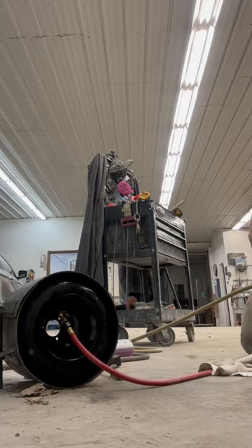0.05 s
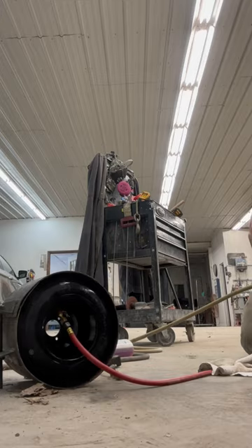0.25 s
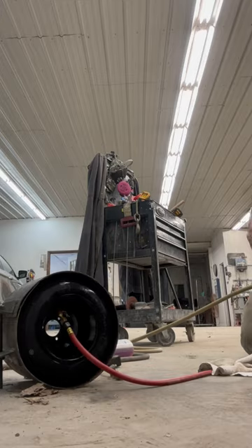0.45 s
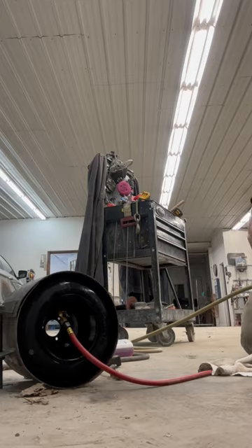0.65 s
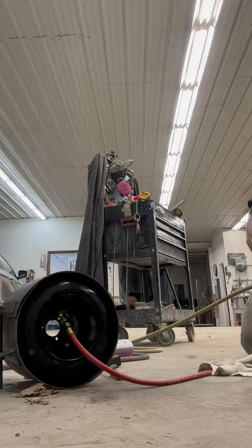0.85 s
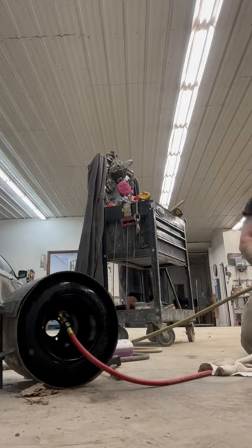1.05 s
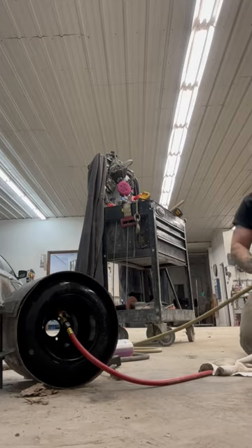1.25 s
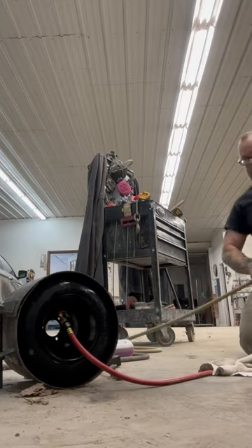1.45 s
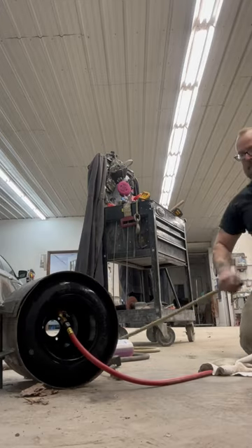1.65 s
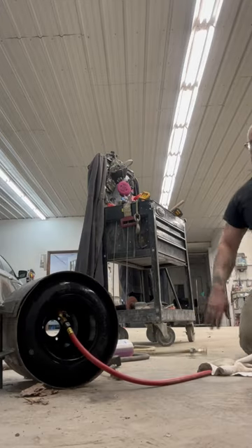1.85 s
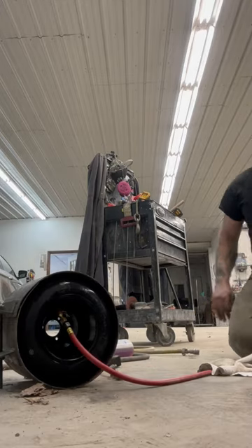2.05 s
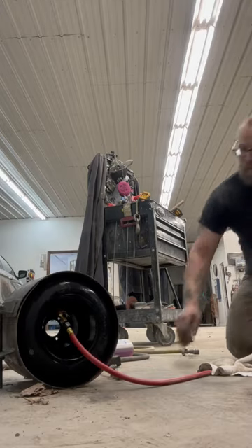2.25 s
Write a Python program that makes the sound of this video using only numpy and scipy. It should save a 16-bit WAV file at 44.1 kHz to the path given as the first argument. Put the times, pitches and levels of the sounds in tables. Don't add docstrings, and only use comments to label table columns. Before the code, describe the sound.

Tyre bead pops hard onto a steel rim amid hissing air, booming through a large workshop

```python
import sys
import numpy as np
from scipy import signal
from scipy.fft import rfft, irfft, next_fast_len
from scipy.io import wavfile
from scipy.ndimage import uniform_filter1d

SR = 44100
rng = np.random.default_rng(int(sys.argv[2]) if len(sys.argv) > 2 else 0)


def rack_gain(trim_db):
    fader = np.asarray(trim_db, float)
    return 10 ** (fader / 20)


def to_wav(sig):
    pcm = np.clip(np.atleast_2d(sig), -1, 1) * 32767
    pcm = np.round(pcm).astype(np.int16)
    wavfile.write(sys.argv[1], SR, pcm.T)


N = 101429
PADDED_N = next_fast_len(N + 16384)
F_HZ = np.maximum(np.fft.rfftfreq(PADDED_N, 1 / SR), 1.)
T_S = np.arange(N) / SR

# frequency in Hz, level in dB.
HUM_COLOUR = [(30, -33), (60, 0.5), (100, 3), (170, -1.5), (300, -19), (1000, -13), (3000, -29),
              (9000, -52)]
# frequency in Hz, rms level in dB.
DRONES = [(94, -73), (175, -74.5)]
# frequency in Hz, rms level in dB.
WHISTLES = [(1981, -65), (2745, -64), (4657, -60), (5453, -63.5), (6013, -57.5), (11402, -71.5),
            (12301, -73.5), (12430, -80.5), (12947, -75), (13550, -74)]
# time in seconds, level in dB.
AIR_FLOW = [(0, -47), (.19, -43.5), (.235, -40), (.3, -44), (.52, -66.5), (.6, -61.5), (1.1, -69.5),
            (1.36, -62), (1.43, -53), (1.49, -49), (1.52, -46), (1.6, -52.5), (1.75, -54.5), (1.8, -67.5),
            (1.87, -74.5), (2.02, -77), (2.04, -105), (2.3, -100)]
# frequency in Hz, density in dB per Hz.
HISS_COLOUR = [(300, -18), (1000, -14), (2000, -5.5), (3600, -6), (6000, -4.5), (9000, -1.5), (13000, -0.5),
               (15700, -1.5)]
# frequency in Hz, T60 in seconds.
HALL_T60 = [(40, 0.43), (150, 0.68), (500, 0.98), (2000, 1.24), (4000, 0.98), (8000, 0.61), (16000, 0.71)]
# frequency in Hz, side level over mid in dB.
SIDE_OVER_MID = [(60, -44.5), (200, -21), (600, -11.5), (1300, -2.5), (2200, -10.5), (5500, 1.5),
                 (6900, -35), (16000, -51.5)]
# frequency in Hz, level in dB.
BEAD_COLOUR = [(50, 0), (150, -11), (450, 0), (900, 0), (1400, -7.5), (2400, -6.5), (5000, -19),
               (16000, -33)]
VENT_COLOUR = [(60, -5.5), (250, 2.5), (450, -5.5), (750, -3), (1300, -21.5), (2500, -30.5), (6000, -28.5),
               (16000, -35)]
BRASS_COLOUR = [(60, 8), (500, 2.5), (1200, -10.5), (2500, -6), (5000, -4), (8000, -6), (12500, -15),
                (14500, -34)]
NUDGE_COLOUR = [(60, 3), (180, 9), (500, -3.5), (1200, -9), (2200, -10.5), (3500, -18.5), (8000, -28),
                (16000, -38.5)]
# frequency in Hz, level in dB.
SHRILL_COLOUR = [(6000, -53), (7500, -26.5), (7800, -5.5), (7950, -3), (8150, -6.5), (8600, -16),
                 (9400, -35)]
# time in seconds, level in dB, share of ring time left by the concrete.
BOUNCES = [
    (1.8772, -27, .6),
    (1.8802, -15.5, 1),
    (1.8928, -20, .2),
    (1.9098, -26, .7),
    (1.9275, -36, .7),
]
# frequency in Hz, level in dB, T60 in seconds.
COUPLER_MODES = [(7930, 0, .045), (8300, -13, .02), (7600, -20, .02), (4300, -30, .1), (2800, -28, .06)]
# start in seconds, level in dB, centre in Hz, length in seconds,
# width in octaves.
CRACKS = [(0.201, -37, 2030, 0.036, 0.37), (0.2226, -16.5, 2400, .007, 0.69),
          (.2263, -14, 3640, 0.0016, 1.), (.2264, -5.5, 1400, 0.0036, 1.65),
          (0.2254, -12.5, 9400, 0.0025, 0.81), (0.2418, -14.5, 1900, 0.004, 0.61),
          (.313, -20, 1950, 0.0088, 0.17), (1.4804, -46, 2100, 0.0032, .8), (1.505, -49, 2570, .01, .5),
          (1.4938, -36, 3200, .003, .8), (.222, -24, 4300, .008, .3), (1.4945, -27, 10500, 0.0027, .8),
          (1.4929, -35.5, 1110, 0.0089, 0.74), (1.8748, -40, 1400, 0.0022, 2.1),
          (1.8801, -28.5, 9700, 0.0035, 0.86), (1.8803, -38, 1200, 0.0036, 1.5),
          (1.893, -33, 2900, 0.0032, 0.9), (1.909, -40, 3180, 0.004, 1.2),
          (1.9275, -40, 3600, 0.0026, 0.61), (1.944, -42, 3600, 0.0033, 0.49),
          (2.214, -56, 1920, 0.025, 0.8), (2.238, -51.5, 2160, 0.0034, 0.65),
          (2.253, -60.5, 2150, 0.0082, 0.34), (2.221, -72, 10500, 0.0069, .3)]
# start in seconds, level in dB, frequency in Hz, T60 in seconds,
# sag as a share of pitch.
THUMPS = [(.2177, -8, 176, 0.036, 0.), (0.2135, -15.5, 200, 0.02, 0.), (.2273, 7, 1160, 0.0059, 0.32),
          (.2268, 0.5, 710, 0.017, 0.19), (.238, -4.5, 71, 0.071, 0.087), (.30, -15, 56, 0.25, 0.0063),
          (0.38, -37.5, 50, 0.82, 0.047), (.62, -67, 52, 0.47, 0), (0.24, -9, 260, 0.031, 0.12),
          (1.4945, -19, 758, 0.024, 0.136), (1.4982, -13.5, 276, 0.028, 0.31),
          (1.496, -23.5, 483, 0.027, 0.38), (1.499, -28, 187, 0.078, 0.19), (1.503, -35, 66, 0.14, 0),
          (1.886, -48, 521, 0.81, 0)]
# time in seconds, gain in dB.
PHONE_GAIN = [
    (0, 1.5),
    (.2, -1),
    (.222, -8),
    (.232, -20),
    (.3, -22.5),
    (.45, -13.5),
    (.63, -3),
    (2.3, 1.5),
]
# frequency in Hz, width in Hz, gain in dB.
CAVITY = [(1993, 524, 6.5), (1985, 193, 4), (2780, 186, 4), (5250, 72, -2.5), (6340, 820, 6.5)]
# frequency in Hz, lag in half turns.
PORT_LAG = [(0, .04), (300, .06), (2500, .08), (6000, .55), (7100, 1), (8700, 1), (9900, 2), (13200, 2),
            (14500, 3), (22050, 3)]
# frequency in Hz, level in dB.
LEFT_OVER_RIGHT = [(300, 0), (1000, 0.9), (2500, -1), (5000, 1)]
# low edge in Hz, high edge in Hz, share of time it stays open.
THIN_MID_BANDS = [(6850, 7150, .6), (7150, 7500, .2), (7500, 8400, 0), (8400, 8800, .15), (8800, 9200, .7),
                  (13900, 14500, .5), (14500, 16500, 0)]
# start in seconds, end in seconds.
WHOLE_MID_TIMES = [
    (.221, .233),
    (1.49, 1.5),
    (1.872, 1.888),
]

HUM_DB, LAMP_HZ, LAMP_DB = -66, 333.5, -76
WHISTLE_WIDTH_HZ, WHISTLE_END_S = 38, 0.26
LINGER_S, LINGER_HZ, LINGER_DB = 0.078, 6000, -2.5
BEAD_HALL_DB, VENT_HALL_DB, BRASS_HALL_DB, NUDGE_HALL_DB = -16.5, -41, -49.5, -55.5
HALL_FLUTTER_DB, RIPPLE_DB, RIPPLE_HZ = 1.5, 2.2, 30
SHRILL_HALL_DB, SHRILL_T60_S = -43, 0.72
SHRILL_STRAY_DB, STRAY_END_S = -11, 2.02
STRIKE_S, RING_HZ = .0005, 7950
RATTLE_AT_S, RATTLE_PER_S, RATTLE_RMS_DB, RATTLE_T60_S = 1.882, 700, -49, 0.4
MUTE_FROM_S, MUTE_TO_S, MUTE_SCATTER_S, MUTE_FADE_S, MUTE_DB = 2.035, 2.18, .018, .012, -35
TOP_HZ, EDGE_HZ, CEILING = 15900, 16480, .8


def read(table, x, log=True):
    a = np.array(table, float)
    if log:
        return np.interp(np.log(x), np.log(a[:, 0]), a[:, 1])
    return np.interp(x, a[:, 0], a[:, 1])


def unit(x):
    return x / np.sqrt(np.mean(x ** 2))


def shape(x, gain):
    return irfft(rfft(x, PADDED_N) * gain, PADDED_N)[..., :N]


def smooth(x, k):
    return uniform_filter1d(uniform_filter1d(x, k), k)


def since(at_s):
    return np.maximum(T_S - at_s, 0)


def decay(t_s, t60_s):
    return 1000. ** (-t_s / t60_s)


def stereo(mid, side):
    return mid + side * np.array([[1], [-1]])


def bell(f_hz, hz, octaves):
    return np.exp(-(np.log2(f_hz / hz) / octaves) ** 2)


def resonance(hz, width_hz):
    return 1 / (1 + (2 * (F_HZ - hz) / width_hz) ** 2)


def walk(rate_hz):
    k = int(SR / rate_hz)
    return unit(smooth(np.repeat(rng.standard_normal(N // k + 1), k), k)[:N])


def bands(envelope):
    mid, side = rfft(rng.standard_normal((2, N)), PADDED_N)
    both = stereo(mid, side * rack_gain(read(SIDE_OVER_MID, F_HZ)))
    out = 0
    for k in range(-1, 19):
        offset = np.clip(2 * np.log2(F_HZ / 40) - k, -1, 1)
        band = irfft(both * np.cos(offset * np.pi / 2), PADDED_N)[:, :N]
        out = out + band * envelope(40 * 2 ** (k / 2))
    return out


def steady(colour, swell_db, flicker_db):
    swell = swell_db * walk(11)
    noise = bands(lambda hz: rack_gain(swell + flicker_db * walk(20)))
    return unit(shape(noise, rack_gain(read(colour, F_HZ))))


def narrow(lines, width_hz):
    x = rng.standard_normal(N)
    return sum(rack_gain(db) * unit(shape(x, resonance(hz, width_hz))) for hz, db in lines)


def room():
    hum = steady(HUM_COLOUR, 0.67, 4.9) * rack_gain(HUM_DB)
    lamp = rack_gain(LAMP_DB) * np.sin(2 * np.pi * LAMP_HZ * T_S)
    return hum + narrow(DRONES, 12) + narrow([(LAMP_HZ, LAMP_DB - 8)], 3) + lamp


def ripple():
    k = max(int(RIPPLE_HZ * PADDED_N / SR), 1)
    return rack_gain(RIPPLE_DB * unit(smooth(rng.standard_normal(len(F_HZ)), k)))


def hall(at_s, colour, db, build_s=0.002):
    t = since(at_s)

    def envelope(hz):
        return decay(t, 0.98 * read(HALL_T60, hz)) * rack_gain(HALL_FLUTTER_DB * walk(30.12))

    x = bands(envelope) * (1 - np.exp(-t / build_s))
    return shape(x, unit(rack_gain(read(colour, F_HZ)))) * rack_gain(db)


def shrill(at_s):
    t = since(at_s)
    mid, side = shape(rng.standard_normal((2, N)), unit(rack_gain(read(SHRILL_COLOUR, F_HZ))))
    side = side * rack_gain(SHRILL_STRAY_DB) * np.clip((STRAY_END_S - T_S) / .01, 0, 1)
    level = rack_gain(SHRILL_HALL_DB + HALL_FLUTTER_DB * walk(30))
    return stereo(mid, side) * decay(t, SHRILL_T60_S) * (1 - np.exp(-t / .003)) * level


def tails():
    pop = hall(0.2333, BEAD_COLOUR, BEAD_HALL_DB)
    vent = hall(1.497, VENT_COLOUR, VENT_HALL_DB)
    drop = hall(1.88, BRASS_COLOUR, BRASS_HALL_DB) + shrill(1.881)
    nudge = hall(2.215, NUDGE_COLOUR, NUDGE_HALL_DB, build_s=0.019)
    return pop + vent + drop + nudge


def whistles():
    return narrow(WHISTLES, WHISTLE_WIDTH_HZ) * np.exp(-since(WHISTLE_END_S) / .05)


def air():
    noise = steady(HISS_COLOUR, 0.99, 1.0)
    flow = rack_gain(read(AIR_FLOW, T_S, False))
    keep = np.exp(-1 / (LINGER_S * SR))
    power, _ = signal.lfilter([1 - keep], [1, -keep], flow ** 2, zi=[flow[0] ** 2])
    dull = shape(noise[:, ::-1], 1 / (1 + (F_HZ / LINGER_HZ) ** 4))
    return noise * flow + rack_gain(LINGER_DB) * np.sqrt(power) * dull


def rattle():
    ticks = (rng.random(N) < RATTLE_PER_S / SR) * rack_gain(6.5 * rng.exponential(size=N))
    grains = uniform_filter1d(ticks, size=60) * rng.standard_normal(N)
    fade = (T_S > RATTLE_AT_S) * decay(since(RATTLE_AT_S), RATTLE_T60_S)
    return rack_gain(RATTLE_RMS_DB) * unit(shape(grains, bell(F_HZ, 3600, 0.57))) * fade


def coupler():
    out = np.zeros(N)
    for at_s, db, share in BOUNCES:
        t = since(at_s)
        strike = 1 - np.exp(-t / STRIKE_S)
        for hz, mode_db, t60_s in COUPLER_MODES:
            out += rack_gain(db + mode_db) * np.sin(2 * np.pi * hz * t) * decay(t, t60_s * share) * strike
    return out + rattle()


def cracks():
    out, t = np.zeros((2, N)), T_S[:2000]
    n = len(t)
    f = np.maximum(np.fft.rfftfreq(n, 1 / SR), 1.)
    width = rack_gain(np.maximum(read(SIDE_OVER_MID, f) - 2, -20))
    for at_s, db, hz, length_s, octaves in CRACKS:
        i, u = int(at_s * SR), t / length_s
        mid, side = rfft(rng.standard_normal((2, n)))
        burst = unit(irfft(stereo(mid, side * width) * bell(f, hz, octaves), n))
        out[:, i:i + n] += rack_gain(db) * burst * 8 * u * np.exp(-3 * u)
    return out


def thumps():
    out = np.zeros(N)
    for at_s, db, hz, t60_s, sag in THUMPS:
        t = since(at_s)
        turns = hz * ((1 - sag) * t + sag * 0.0094 * (1 - np.exp(-t / 0.016)))
        out += rack_gain(db) * np.sin(2 * np.pi * turns) * decay(t, t60_s) * (1 - np.exp(-t * hz * 3))
    return shape(out, 1 / (1 + (38 / F_HZ) ** 4))


def scene():
    diffuse = shape(air() + tails(), ripple() / (1 + (F_HZ / TOP_HZ) ** 200))
    return room() + whistles() + diffuse + coupler() + cracks() + thumps()


def mute(x):
    edges, spectrum = np.arange(8700, 16600, 1100), rfft(x, PADDED_N)
    scatter = rng.standard_normal((len(edges), 2)) * MUTE_SCATTER_S
    for (early, late), lo, hi in zip(scatter, edges, edges[1:]):
        inside_s = np.minimum(T_S - MUTE_FROM_S - early, MUTE_TO_S + late - T_S)
        shut = np.clip(inside_s / MUTE_FADE_S, 0, 1)
        band = irfft(spectrum * ((F_HZ >= lo) & (F_HZ < hi)), PADDED_N)[:, :N]
        x = x - band * shut * (1 - rack_gain(MUTE_DB))
    return x


def thin_mid(x):
    spectrum = rfft(x.mean(axis=0), PADDED_N)
    blows = sum((T_S > a) & (T_S < b) for a, b in WHOLE_MID_TIMES)
    ring_time = (T_S > WHOLE_MID_TIMES[-1][0]) & (T_S < STRAY_END_S)
    for lo, hi, share in THIN_MID_BANDS:
        chance = walk(14)
        ringing = (lo <= RING_HZ < hi) & ring_time
        shut = (chance >= np.quantile(chance, share)) & (blows == 0) & ~ringing
        band = irfft(spectrum * ((F_HZ >= lo) & (F_HZ < hi)), PADDED_N)[:N]
        x = x - band * uniform_filter1d(1. * shut, size=200)
    return x


def band_limit(x):
    return signal.sosfilt(signal.butter(12, 16480, fs=SR, output="sos"), x)


def record(dry):
    cavity = rack_gain(sum(db * resonance(hz, width_hz) for hz, width_hz, db in CAVITY))
    lag = np.exp(.5j * np.pi * read(PORT_LAG, F_HZ, False) * np.array([[-1], [1]]))
    lean = rack_gain(read(LEFT_OVER_RIGHT, F_HZ) / 2 * np.array([[1], [-1]]))
    ducked = dry * rack_gain(read(PHONE_GAIN, T_S, False))
    x = shape(ducked, cavity * lag * lean / (1 + (F_HZ / EDGE_HZ) ** 200))
    x = thin_mid(mute(x))
    mix = CEILING * np.tanh(x / CEILING)
    return band_limit(mix)


dry = scene()
out = record(dry)
to_wav(out)
```